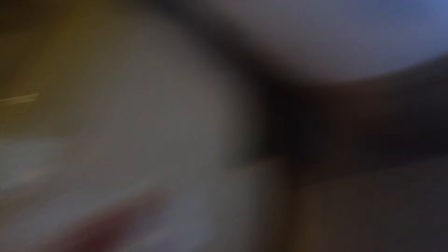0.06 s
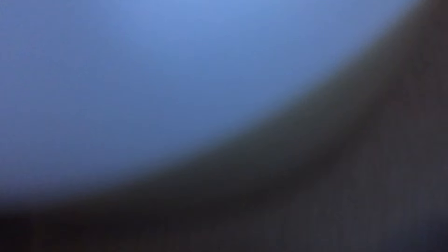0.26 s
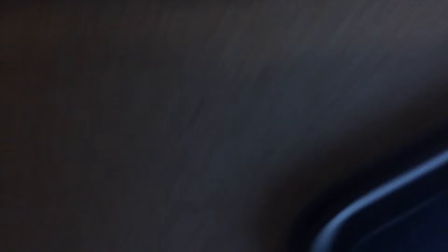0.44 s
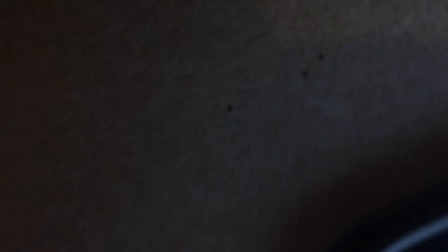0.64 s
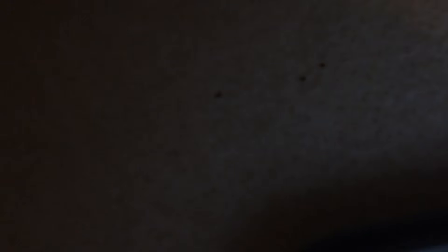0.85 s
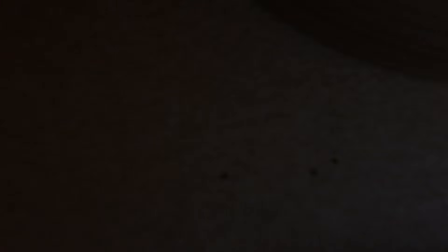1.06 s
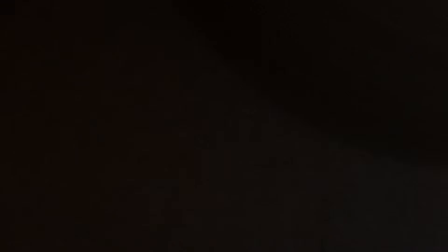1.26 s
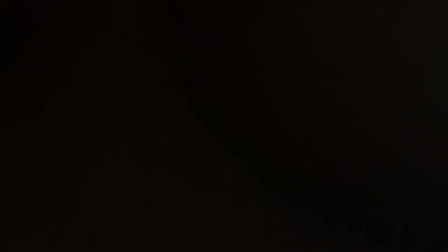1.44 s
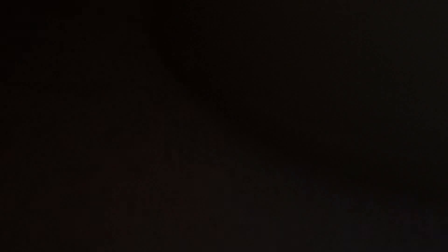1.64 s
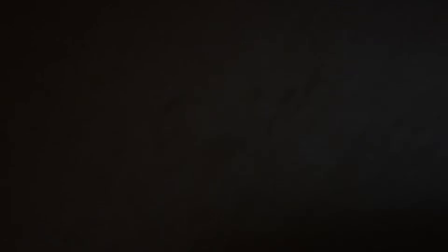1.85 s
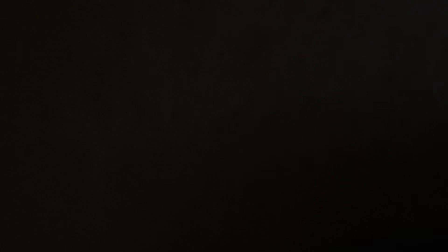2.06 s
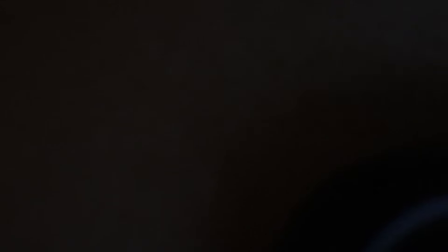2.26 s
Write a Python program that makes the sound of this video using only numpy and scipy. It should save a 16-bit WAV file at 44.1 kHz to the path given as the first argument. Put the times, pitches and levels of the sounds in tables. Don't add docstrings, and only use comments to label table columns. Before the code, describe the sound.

Very close, dry handling of steel handcuffs: sharp clicks and boxy knocks crowd the first three quarters of a second, followed by muffled finger drags, faint cloth rustle, a dull thud and a light late clack over soft hiss.

```python
import sys
import numpy as np
from scipy import signal
from scipy.fft import rfft, irfft, next_fast_len
from scipy.io import wavfile
from scipy.ndimage import uniform_filter1d, map_coordinates

SR = 44100
rng = np.random.default_rng(int(sys.argv[2]) if len(sys.argv) > 2 else 0)


def bounce(signal):
    frames = np.transpose(np.atleast_2d(signal))
    limited = np.clip(frames, -1, 1)
    pcm = np.round(limited * 32767).astype(np.int16)
    wavfile.write(sys.argv[1], SR, pcm)


def voltage_ratio(decibels):
    exponent = np.asarray(decibels, float) / 20
    return 10 ** exponent


N = 101429

# [f/Hz, level/dB]
RUMBLE_SHAPE = [(20, -20), (60, -6), (100, -9.5), (128, 2.5), (150, -8), (190, -8), (300, -23.5),
                (600, -110)]
# [t/s, level/dB]
HAND_TREMOR = [(0, -51), (.2, -57), (.42, -56.5), (.53, -38.5), (.66, -48), (.9, -58.5), (1.03, -61.5),
               (1.12, -47.5), (1.3, -53.5), (1.5, -58), (1.75, -63.5), (1.88, -56), (2.05, -54),
               (2.3, -52.5)]
# [f/Hz, level/dB]
HISS_SHAPE = [(200, -54), (400, -15), (1200, -9), (2500, -6), (15500, -17.5)]
# [t/s, level/dB, brightest f/Hz]
CLOTH_SLIDES = [(0, -60.5, 6900), (.1, -64.5, 5240), (.2, -60, 4100), (.36, -58, 3860), (.48, -72.5, 3110),
                (.58, -63, 5000), (.66, -63.5, 3840), (.9, -67.5, 2300), (1.1, -61.5, 5640),
                (1.18, -57.5, 5830), (1.21, -72, 4000), (1.5, -62, 6400), (1.62, -78, 3810),
                (1.8, -66, 4890), (1.9, -81, 4030), (2.2, -75, 4700), (2.3, -58.5, 4840)]
# [f/Hz, width/Hz, level/dB]
SHELL_RESONANCES = [(345, 72, 17), (649, 198, 0), (760, 275, -1.5), (965, 158, -4), (1510, 280, -22),
                    (1850, 194, -24)]
# [t/s, length/s, level/dB, deep ring over it/dB]
FINGER_DRAGS = [(0.035, 0.022, -61.5, 7), (0.128, 0.0087, -55, -4), (0.185, 0.069, -61.5, -7),
                (0.239, 0.072, -39, 8.5), (0.351, 0.02, -63, 12), (0.528, 0.063, -33, 9.5),
                (0.602, 0.027, -33.5, 5.5), (0.665, 0.092, -44, 2), (0.783, 0.032, -55.5, 15),
                (0.84, 0.077, -54.5, 4), (0.931, 0.059, -51, 22), (1.003, 0.1, -49, 17),
                (1.071, 0.059, -42, 15), (1.132, .035, -38, 5), (1.202, 0.034, -61.5, 25),
                (1.25, 0.072, -48, 15.5), (1.342, 0.19, -74, 20.5), (1.464, 0.072, -53, 16),
                (1.59, 0.037, -63.5, 9), (1.652, 0.015, -50.5, -20), (1.783, 0.47, -96, 29),
                (1.965, 0.042, -46, 8), (2.11, 0.052, -64, 12), (2.234, 0.043, -51.5, 9)]
# [t/s, peak level/dB]
HAND_PUSHES = [
    (0.236, -15.5),
    (0.489, -36),
    (0.523, -18),
    (0.562, -21),
    (1.557, -33),
    (1.973, -33.5),
]
# [t/s, length/s, level/dB]
STEEL_SCRAPES = [
    (0.249, 0.035, -47),
    (0.2997, 0.014, -39.5),
    (0.515, .025, -50),
    (0.551, 0.0047, -45.5),
    (0.566, .018, -40.5),
    (0.615, 0.009, -50),
    (1.564, 0.023, -57.5),
]
# [t/s, length/s, level/dB]
CUFF_WHINES = [
    (0.744, 0.1, -69.5),
    (1.584, 0.13, -75.5),
    (2.1, 0.17, -77),
]
# [t/s, level/dB, f/Hz]
LIGHT_TAPS = [(.046, -50, 760), (.218, -53, 703), (.366, -45, 746), (.633, -26, 802), (.928, -41.5, 649),
              (.943, -38.5, 660), (.941, -34.5, 334), (.958, -34, 345), (.97, -34.5, 352),
              (1.017, -35, 356), (1.205, -39, 345), (1.042, -36, 674), (1.085, -41, 735), (1.111, -32, 855),
              (1.298, -33.5, 814), (1.258, -41, 685), (1.284, -31, 890), (1.333, -41.5, 628),
              (1.625, -50.5, 900), (1.668, -45, 760), (2.272, -42, 764)]
# [f/Hz, level/dB, time to fall 60 dB/s]
RIM_TONES = [(349.3, -2.5, 0.036), (674, -3, 0.055), (785, -7.5, 0.048), (1090, 0, 0.031),
             (1250, -7, 0.017), (1362, -6.5, 0.046), (2053, -9, 0.044), (2167, -9.5, 0.063),
             (2840, -16, .025), (3127, -13.5, .025), (4200, -35, 0.0099)]
# [f/Hz, level/dB, time to fall 60 dB/s]
CORNER_TONES = [(326, 2, 0.036), (648, -9.5, 0.035), (767, -6.5, 0.041), (1015, -5, 0.021),
                (1106, -16.5, 0.028), (1420, -18.5, 0.051), (2010, -8.5, 0.017), (2106, -19, 0.054),
                (4270, -21, 0.017)]
# [t/s, level/dB]
RIM_BLOWS = [
    (.5215, -17),
    (.5268, -26),
    (.6207, -27),
    (1.0865, -48),
    (1.1445, -45.5),
    (1.174, -44),
]
# [t/s, level/dB]
CORNER_BLOWS = [
    (1.9738, -23),
]
# [t/s, peak level/dB, brightest f/Hz]
STEEL_TICKS = [(0.218, -41, 5500), (0.236, -30, 4280), (0.246, -23.5, 8400), (0.2678, -31.5, 7640),
               (0.3022, -34, 4300), (0.3055, -34, 4750), (0.3102, -22.5, 3450), (.312, -31, 3170),
               (0.3188, -24, 2940), (0.367, -39, 3470), (0.4147, -43, 4970), (0.4176, -37.5, 8200),
               (0.4198, -19, 2900), (0.429, -26, 2870), (0.51, -34, 2570), (0.5217, -10, 4300),
               (0.555, -15.5, 5600), (0.572, -29, 11200), (0.5817, -29, 11200), (.619, -30, 11400),
               (0.6412, -45, 3690), (0.688, -36.5, 11400), (0.7053, -35, 5940), (0.7307, -37.5, 3800),
               (1.144, -35.5, 3440), (1.171, -43, 3970), (1.557, -25, 4200), (1.5625, -31.5, 5730),
               (1.5715, -44, 3080), (1.5758, -32, 3120), (1.621, -51, 3800), (1.667, -42, 3280),
               (2.2474, -35.5, 8100)]
# [t/s, peak level/dB]
EDGE_SNAPS = [
    (0.2455, -11),
    (0.3038, -18),
    (.3168, -28),
    (.427, -11),
    (0.5236, -10),
    (.554, -9.5),
    (0.6212, -38),
    (1.9738, -24.5),
]
# [f/Hz, level/dB, time to fall 60 dB/s]
THUD_TONES = [(208.4, -6, 0.096), (423, -1.5, 0.074), (502, -3.5, 0.053)]
# [f/Hz, level/dB, time to fall 60 dB/s]
UPPER_TONES = [(686, -8, .06), (813, -9, .07), (908, -10, .04), (1019, -11, .04)]
# [f/Hz, level/dB, time to fall 60 dB/s]
DEEP_TONES = [(320.5, 1.5, 0.081), (420, -4, 0.052)]
# [f/Hz, level/dB, time to fall 60 dB/s]
CLACK_TONES = [(1104, -8, 0.042), (1372, -0.5, 0.025), (2013, -4.5, 0.022)]
# [t/s, upper ring level/dB, its leading f/Hz, deep ring over it/dB, mid clack over it/dB]
CASE_KNOCKS = [(0.244, -15, 801, -14, -6), (0.266, -16.5, 744, -26, -11.5), (0.282, -23, 804, -5, -10),
               (0.3034, -26, 816, -10, -3), (0.416, -19.5, 947, -6.5, -1.5), (0.427, -14.5, 773, -12, -8.5),
               (0.5227, -21.5, 770, -2, 9.5), (0.5546, -8, 768, -17, -8.5), (0.583, -23.5, 935, 0, -5),
               (0.621, -28.5, 650, -3, -25), (0.688, -30, 770, -3.5, -9), (0.706, -21, 740, -14.5, -9),
               (0.731, -27.5, 754, -21, -11), (0.76, -31.5, 680, -22, -10.5), (0.861, -34, 715, -18, -41),
               (1.102, -24.5, 964, -4.5, -26), (1.143, -34.5, 790, 4, -4), (1.172, -29, 1090, 3.5, -1.5),
               (1.281, -25.5, 768, -2.5, -24), (1.555, -16, 725, -9, -27), (1.974, -30, 637, -4, 4.5),
               (2.153, -36, 657, -10, -18.5), (2.245, -42, 785, -4, 7)]


def unit(x):
    return x / np.sqrt(np.mean(x ** 2) + 1e-20)


def along(points, hz):
    f, v = np.transpose(points)
    return np.interp(np.log(hz + 1), np.log(f + 1), v)


def curves(rows):
    s, *cols = np.transpose(rows)
    return [np.interp(np.arange(N) / SR, s, c) for c in cols]


def wobble(rate):
    knots = rng.standard_normal(int(N * 100 / SR) + 4)
    return map_coordinates(knots, [np.arange(N) * min(rate, 99) / SR])


def filtered(x, response):
    m = next_fast_len(len(x) + SR // 2)
    return irfft(rfft(x, m) * response(np.fft.rfftfreq(m, 1 / SR)), m)[:len(x)]


def peak(f, hz, width):
    return 1j * f * width / (hz * hz - f * f + 1j * f * width)


def add(track, s, sound):
    track[round(s * SR):][:len(sound)] += sound


def ring(tones, t, spread_db):
    total = 0
    for hz, db, t60 in tones:
        level = voltage_ratio(db + spread_db * rng.normal() - 60 * t / t60)
        total = total + level * np.sin(2 * np.pi * hz * (1 + 0.014 * rng.normal()) * t)
    return total


def room():
    sway_db, = curves(HAND_TREMOR)
    low = filtered(rng.standard_normal(N), lambda f: voltage_ratio(along(RUMBLE_SHAPE, f)))
    high = filtered(rng.standard_normal(N), lambda f: voltage_ratio(along(HISS_SHAPE, f)))
    rumble = voltage_ratio(4.5 + sway_db + 3.5 * wobble(20)) * unit(low)
    return rumble + voltage_ratio(-72) * unit(high)


def walls(x):
    t = np.arange(SR // 4) / SR
    tail = filtered(rng.standard_normal(len(t)) * voltage_ratio(-60 * t / 0.17), lambda f: peak(f, 770, 1800))
    return signal.fftconvolve(x, tail / np.linalg.norm(tail))[:N]


def cloth():
    level_db, centre = curves(CLOTH_SLIDES)
    hz, t, z = signal.stft(rng.standard_normal(N), SR, nperseg=256)
    hz = hz[:, None]
    brightest = np.interp(t, np.arange(N) / SR, centre)
    patches = uniform_filter1d(rng.standard_normal(z.shape), size=5, axis=0)
    patches = uniform_filter1d(patches, size=25, axis=1)
    hump = voltage_ratio(-5) + np.exp(-(np.log((hz + 1) / brightest) / 0.27) ** 2)
    hump = hump * voltage_ratio(2.5 * unit(patches))
    tilt = voltage_ratio(-4 * np.log2(1 + hz / 4000)) * (hz > 1200)
    hiss = signal.istft(z * hump * tilt, SR, nperseg=256)[1][:N]
    return voltage_ratio(level_db - 2.0 + 1.04 * wobble(36.21)) * unit(hiss)


def rub():
    grains_per_s, rise_s, fall_s = 1200, 0.018, 0.016
    t, draw = np.arange(N) / SR, rng.random((2, N))
    slips = (draw[0] < grains_per_s / SR) * rng.standard_normal(N) * voltage_ratio(6.8 * draw[1])
    drive = (unit(slips) + 0.5 * rng.standard_normal(N)) * voltage_ratio(2.5 * wobble(70))

    def upper_shell(f):
        total = sum((-1) ** k * voltage_ratio(db) * peak(f, hz, width)
                    for k, (hz, width, db) in enumerate(SHELL_RESONANCES[1:]))
        return total * peak(f, 1170, 2200)

    upper = unit(filtered(drive, upper_shell))
    deep_hz, deep_width = SHELL_RESONANCES[0][:2]
    deep_drive = rng.standard_normal(N) * voltage_ratio(4.5 * wobble(50.06))
    deep = unit(filtered(deep_drive, lambda f: peak(f, deep_hz, deep_width) * peak(f, 313, 450)))
    out = voltage_ratio(-69.5) * (upper + 1.64 * deep)
    for s, length, db, deep_db in FINGER_DRAGS:
        effort = np.clip((t - s) / rise_s, 0, 1) * np.exp(-np.clip(t - s - length, 0, 9) / fall_s)
        out = out + voltage_ratio(db) * effort * (upper + voltage_ratio(deep_db - 12) * deep)
    return out


def pushes():
    push_s = 0.0013
    out, u = np.zeros(N + SR), np.arange(SR // 16) / SR / push_s
    for s, db in HAND_PUSHES:
        add(out, s, -voltage_ratio(db + 12.5) * u * np.exp(-u / 0.71) * np.sin(1.09 * u))
    return out[:N]


def scrapes():
    t = np.arange(N) / SR
    grit = rng.standard_normal(N) * voltage_ratio(2.5 * rng.standard_normal(N) + 2.5 * wobble(95))
    effort = sum(voltage_ratio(db) * (t > s) * np.exp(-np.clip(t - s - length, 0, 9) / 0.0039)
                 for s, length, db in STEEL_SCRAPES)
    return effort * unit(filtered(grit, lambda f: peak(f, 2340, 3300) ** 2 + 0.04))


def edges():
    press_s, tap_t60_s, tap_rise_s, whine_hz = 0.00025, 0.057, 0.00033, 2680
    out, t = np.zeros(N + SR), np.arange(SR // 4) / SR
    press = np.clip(t / press_s, 0, 1) ** 2
    for blows, tones in ((RIM_BLOWS, RIM_TONES), (CORNER_BLOWS, CORNER_TONES)):
        sound = -press * sum(voltage_ratio(db - 60 * t / t60) * np.cos(2 * np.pi * hz * (t - press_s))
                             for hz, db, t60 in tones)
        for s, db in blows:
            add(out, s, voltage_ratio(db) * sound)
    for s, db, hz in LIGHT_TAPS:
        pair = np.sin(2 * np.pi * hz * t) + 0.5 * np.sin(2 * np.pi * 0.9 * hz * t)
        add(out, s, voltage_ratio(db - 60 * t / tap_t60_s) * (1 - np.exp(-t / tap_rise_s)) * pair)
    for s, length, db in CUFF_WHINES:
        swell = np.sin(np.pi * np.clip(t / length, 0, 1))
        add(out, s, voltage_ratio(db) * swell * np.sin(2 * np.pi * whine_hz * t))
    return out[:N]


def ticks():
    chatter_s = 0.0021
    out, t = np.zeros(N + SR), np.arange(SR // 16) / SR
    for s, db, hz in STEEL_TICKS:
        grit = rng.standard_normal(len(t)) * voltage_ratio(2.8 * rng.standard_normal(len(t)))
        burst = grit * (np.exp(-t / chatter_s) + voltage_ratio(-25.5) * np.exp(-t / 0.011))

        def steel(f):
            bands = 0.19 * peak(f, 4000, 10000) + peak(f, hz, 0.25 * hz)
            return bands / (1 + (f / (3.5 * hz)) ** 4)

        add(out, s, voltage_ratio(db - 3.5) * filtered(burst, steel))
    return out[:N]


def knocks():
    free_s, gripped_db = 0.0056, -9
    out, t = np.zeros(N + SR), np.arange(SR // 8) / SR
    grip = voltage_ratio(gripped_db / (1 + np.exp(-(t - free_s) / 0.000068)))
    fade = voltage_ratio(-60 * np.clip(t - free_s, 0, 1) / 0.027)
    for s, db, hz, deep_db, clack_db in CASE_KNOCKS:
        lead = grip * fade * np.sin(2 * np.pi * hz * t)
        noise = rng.standard_normal(len(t)) * voltage_ratio(-60 * t / 0.033)
        rattle = filtered(noise, lambda f: peak(f, 1600, 1700) ** 2)
        upper = ring(UPPER_TONES, t, 0.62) * (1 - np.exp(-t / 0.00041))
        sound = -voltage_ratio(-4.5) * lead - voltage_ratio(-5.0) * upper
        sound = sound - voltage_ratio(deep_db - 4.5) * ring(DEEP_TONES, t, 0.68)
        sound = sound - voltage_ratio(clack_db - 11.5) * (ring(CLACK_TONES, t, 0.85) + 5 * rattle)
        rise_s = 0.00037 * voltage_ratio(-0.6 * (db + 11))
        add(out, s, voltage_ratio(db) * sound * (1 - np.exp(-t / rise_s)))
    for s, db in EDGE_SNAPS:
        add(out, s, -voltage_ratio(db - 0.5) * np.sin(2 * np.pi * 2600 * t) * np.exp(-t / 0.00016))
    add(out, 1.5563, -voltage_ratio(-19.5) * ring(THUD_TONES, t, 0))
    return out[:N]


def scene():
    hits = knocks() + ticks() + edges()
    handling = pushes() + rub() + cloth()
    return (hits + voltage_ratio(-22.0) * walls(hits) + handling + room() + scrapes())[None]


def band_limit(x):
    return signal.sosfilt(signal.butter(12, 16480, fs=SR, output="sos"), x)


def record(dry):
    def microphone(f):
        return (1j * f / (38 + 1j * f)) ** 3 / (1 + (f / 15450) ** 90)

    mix = filtered(dry[0], microphone)[None]
    return band_limit(mix)


dry = scene()
out = record(dry)
bounce(out)
```